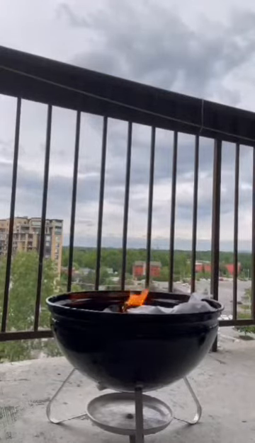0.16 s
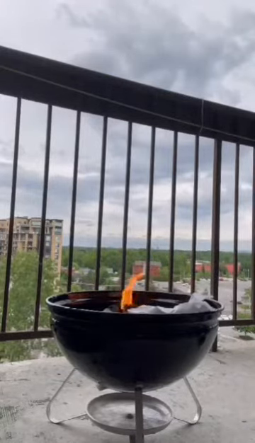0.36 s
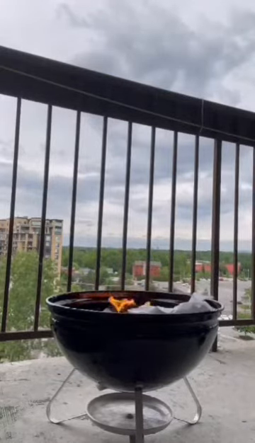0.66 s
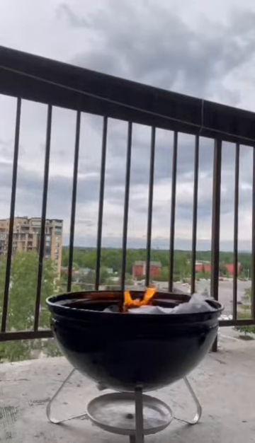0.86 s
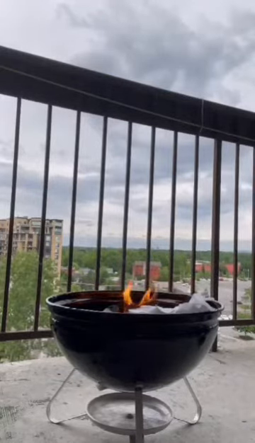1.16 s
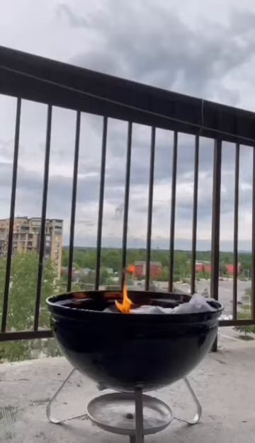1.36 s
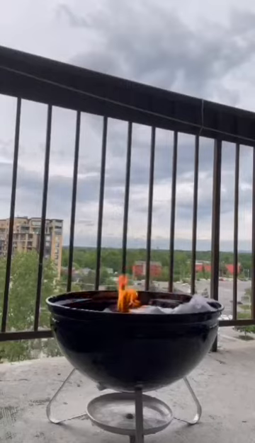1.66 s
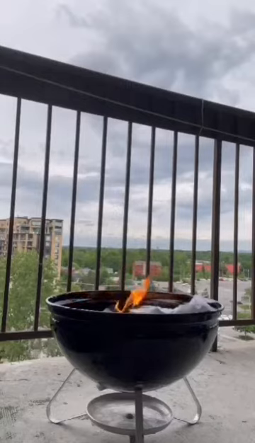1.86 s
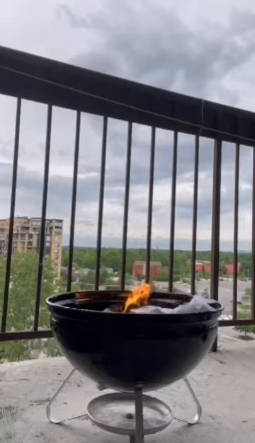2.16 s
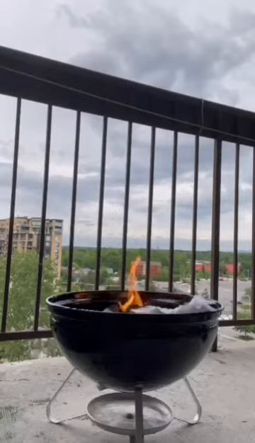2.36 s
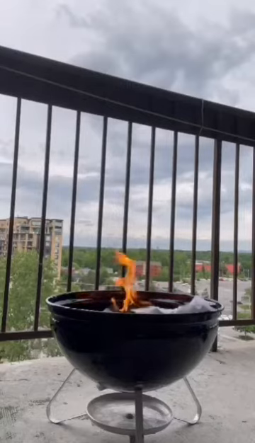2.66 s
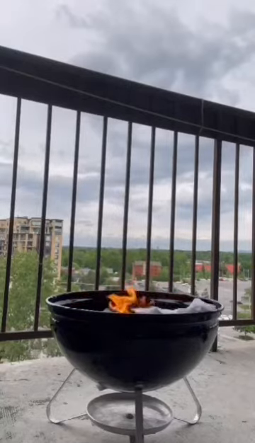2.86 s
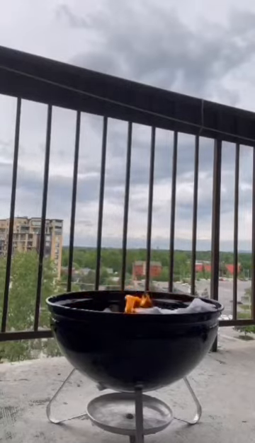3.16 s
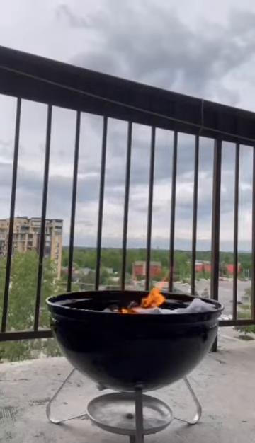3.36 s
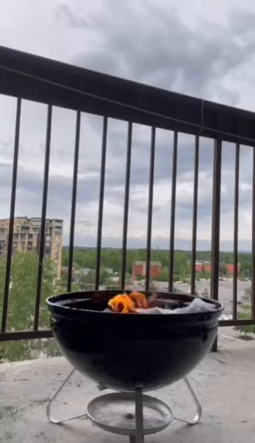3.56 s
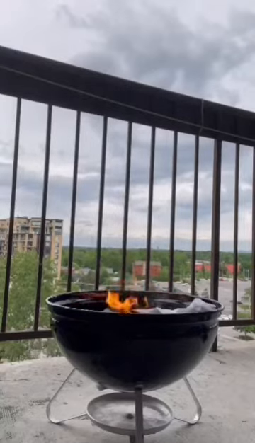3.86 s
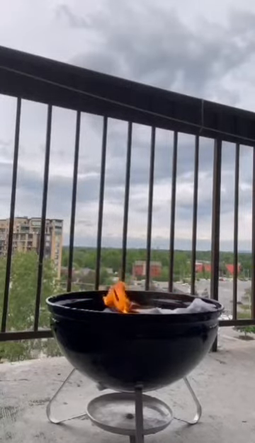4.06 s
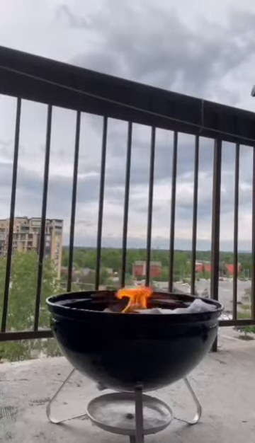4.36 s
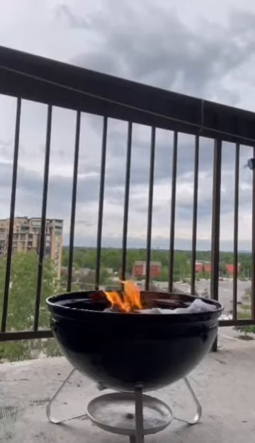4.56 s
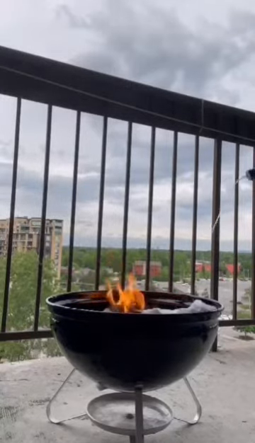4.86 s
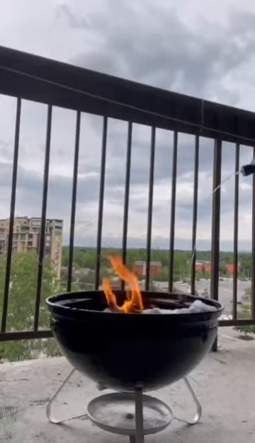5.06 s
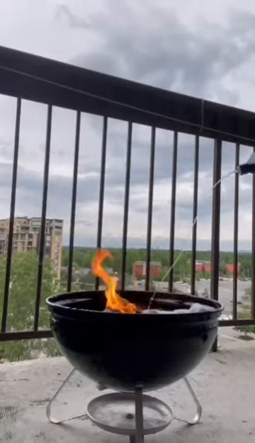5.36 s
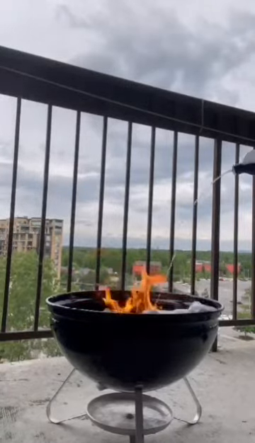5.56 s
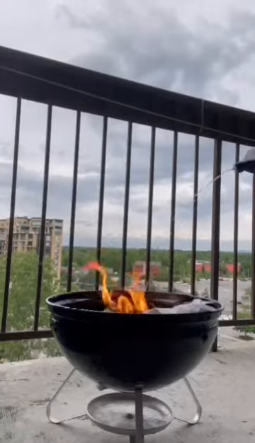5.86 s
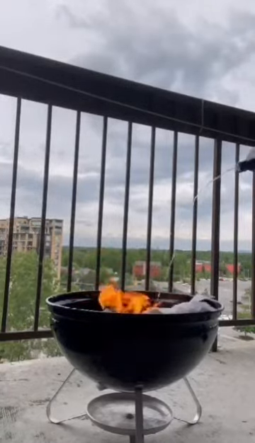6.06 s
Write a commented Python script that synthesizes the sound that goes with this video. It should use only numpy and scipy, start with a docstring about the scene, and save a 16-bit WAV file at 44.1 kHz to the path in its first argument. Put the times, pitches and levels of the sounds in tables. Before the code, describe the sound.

Close stereo pickup of paper and charcoal burning in a small steel grill. A sharp double crack comes first, then a brief vapour spit, scattered woody pops in little clusters, crisp fizzing swells and needle-like ticks. Short echoes come off floor, railing and walls. Beneath, constant soft wind rumble, a low motor hum that swells and wavers, and a distant town wash.

```python
"""First a low rumble of wind, a wavering machine hum and the far wash of the town, up on a high balcony.
Then, close to a pair of microphone ports, paper and charcoal burn in a small steel kettle grill.
Cracks are uneven bursts of noise ringing lump and bowl; sparks tick, and a fine grainy treble swells.
Once a pocket of vapour spits: hissing noise that also blows a resonant cavity.
Random echoes stand for floor, railing, slab and wall; wind and town are coloured noise, the hum is sines."""
import sys
import numpy as np
from scipy import signal
from scipy.fft import rfft, irfft, next_fast_len
from scipy.io import wavfile
from scipy.ndimage import uniform_filter1d, map_coordinates

SR = 44100
rng = np.random.default_rng(int(sys.argv[2]) if len(sys.argv) > 2 else 0)


def output_pcm(signal):
    """Save a mono or channel-first signal as 16-bit PCM at the path in sys.argv[1].

    Samples are clipped to [-1, 1] before scaling.
    """
    pcm = np.clip(np.atleast_2d(signal).T, -1, 1) * 32767
    wavfile.write(sys.argv[1], SR, np.round(pcm).astype(np.int16))


N = 273243
TIME = np.arange(N) / SR  # s

# Far wind, level before a common trim: [t/s, level/dB]
WIND_LEVEL = [(0, -37.5), (.55, -38), (1.4, -39), (2.1, -38.5), (3.0, -38.5), (4.4, -39.5), (6.2, -39)]
# Relative spectra of wind, town, cracking fuel and vapour jet: [f/Hz, level/dB]
WIND_SPECTRUM = [(20, -17), (30, -15.5), (45, -5.5), (60, 3), (78, 1.5), (95, -2.5), (112, -2), (140, -5.5),
                 (170, -10.5), (215, -9), (255, -12.5), (310, -29.5), (400, -35), (600, -90)]
TOWN_SPECTRUM = [(150, -5), (295, 4), (335, 0), (385, -6), (430, 3), (540, 1), (700, -4.5), (930, 0.5),
                 (1150, -4.5), (1500, -10.5), (2200, -16), (3200, -21), (5200, -28.5), (7000, -28.5),
                 (12000, -65.5)]
CRACK_SPECTRUM = [(300, -26.5), (700, -9), (1400, 10.5), (2250, 8), (2700, 6), (3100, 3.5), (4000, 5.5),
                  (5400, 0), (7000, -1), (10500, -3.5), (12500, -13.5)]
HISS_SPECTRUM = [(300, -8), (550, 7), (1200, 3.5), (2000, 13), (2600, 0), (3100, 5), (4200, 5), (5500, 2.5),
                 (6800, 2.5), (8200, -5), (9300, -12), (11300, -2), (12500, -49)]
# Likeness of the two ports for far air and near fire, clipped when read: [f/Hz, correlation/1]
AIR_LIKENESS = [(60, 5.3), (120, 4), (170, 1.6), (250, 0), (350, -0.78), (500, 0.4), (710, 0.19),
                (1010, 0.66), (1430, 0.44), (2200, 0.13), (4100, 0.2), (6000, 0.1), (8300, -0.7),
                (11500, -14)]
FIRE_LIKENESS = [(500, 0.73), (1100, 0.79), (2200, 0.58), (3400, 0.43), (4300, .4), (6000, 0.36), (9000, 1),
                 (11500, 0.54)]
# Tilt of the stereo noise, left over right: [f/Hz, level/dB]
PORT_BALANCE = [(60, 0.5), (100, -0.5), (160, 5), (250, 4), (410, -8), (660, -3), (1070, -4.5), (1740, -3),
                (2800, -2), (4500, 0), (7300, 1), (12000, -1.5)]
# Fundamental of the machine hum, before a common trim: [t/s, level/dB]
HUM_LEVEL = [(0, -36.5), (.55, -34), (.88, -34.5), (1.05, -40), (1.35, -37.5), (1.75, -32.5), (2.05, -31.5),
             (2.3, -35.5), (2.7, -39), (3.2, -34), (3.48, -28), (3.97, -40.5), (4.25, -37.5), (4.45, -32),
             (4.95, -30.5), (5.47, -31.5), (5.65, -37), (6.2, -37.5)]
# Swells of the octave above it, before the same trim: [middle t/s, peak level/dB, half length to 1/e t/s]
OCTAVE_SWELLS = [(.65, -41, 0.12), (1.233, -40, 0.12), (2.143, -39, 0.29), (2.934, -35.5, 0.29),
                 (3.577, -35.5, 0.2), (4.218, -35, 0.27), (5.124, -37.5, 0.3), (5.945, -44.5, 0.44)]
# Swells of fine grainy treble noise: [start t/s, level/dB, hold t/s]
GRAIN_SWELLS = [(.86, -61.5, 0.97), (1.933, -49.5, 0.014), (2.452, -50.5, 0.047), (2.697, -57, 0.17),
                (3.104, -43, 0.017), (3.251, -52, .025), (3.329, -47.5, 0.043), (3.84, -50, .015),
                (5.925, -59, 0.057)]
# Sparks bursting, level before a common trim, fizz against snap:
# [t/s, level/dB, pitch f/Hz, width f/Hz, fizz level/dB, fizz decay to 1/e t/s]
SPARKS = [(2.6775, -39, 10400, 2300, -2, .003), (3.338, -23, 8600, 2600, -14, .002),
          (3.3601, -21.5, 8040, 2300, -5, 0.0014), (4.4674, -38.5, 6140, 900, 4, .004),
          (4.6181, -35, 5500, 2300, -1, 0.011), (4.792, -44.5, 10400, 2300, 0, .004),
          (4.8504, -35.5, 10900, 2020, -3, 0.0034), (5.156, -45, 5070, 2290, -5, 0.0025),
          (5.248, -52.5, 10700, 1500, 8, .004)]
# Gouts in the vapour jet: [t/s, surge of hiss level/dB, surge into cavity level/dB]
GOUTS = [(1.657, 2, 4.5), (1.676, 6, -3), (1.694, -2, 3), (1.701, 1, 2), (1.711, 4.5, 2), (1.724, 0, 6.5)]
# Resonances of the cavity behind the jet: [f/Hz, width f/Hz, relative level/dB]
CAVITY_MODES = [(944, 75, 10.5), (1153, 60, 22), (1290, 81, 17), (1820, 170, 6), (2870, 130, 3)]
# Resonances of the hollow bowl: [f/Hz, width f/Hz, relative level/dB]
BOWL_MODES = [(1010, 380, -3.5), (1350, 370, -2), (1790, 420, 0), (2280, 250, 4), (2990, 270, 1),
              (3550, 180, -3), (4650, 340, -14)]
# Cracks of fuel, with some weak later bursts that act as their reflections;
# before common ring and crack trims; lump against bowl, echo send against direct:
# [t/s, level/dB, lump f/Hz, lump level/dB, direct crack level/dB, length to 1/e t/s,
#  left over right level/dB, echo send level/dB]
POPS = [(1.402, -38.5, 2960, -7, -21, .009, 1, 4), (1.4645, -17.5, 3300, 2, -16.5, 0.0011, 0, -9),
        (1.4668, -17, 2210, 3, -18, 0.00086, 4, -1), (1.474, -37, 1700, -2, -4, .003, 3, 1),
        (1.4838, -16.5, 3000, 1, -14, 0.0021, -1.5, -5), (1.4865, -24, 1970, 8, -21, 0.0024, 5, -1),
        (1.4915, -36.5, 3000, -2, -8, 0.0065, -1, 2), (1.4983, -38, 3000, -4, -8, .0018, 4, -2),
        (1.9342, -30, 1890, -2, -13.5, 0.0027, -3.5, -5), (1.9375, -36, 3090, -5, -19, .0023, 4, 3),
        (1.9675, -41, 3000, -7, -16, 0.0062, 3, 0), (2.1727, -37, 1580, 0, -12, .004, 0, 0.5),
        (2.4528, -33, 3090, 3, -13, 0.0031, 1, -1), (2.4565, -34.5, 1400, 7, -12, 0.0038, 0, 0),
        (2.4847, -37, 3370, 7, -6.5, .003, 2, -2), (2.677, -30, 1310, 4, -14, 0.0041, 0.5, 1),
        (2.7285, -44.5, 3400, 4, -12, .0035, 4, 1), (2.7725, -35.5, 3260, -3, -18, 0.0037, 3, -2),
        (2.8578, -30, 3230, -7, -14.5, 0.0012, 2, -4), (2.8595, -38, 1450, 7, -15, 0.0024, 2, 1),
        (3.0618, -37, 3250, -5, -22, .0021, 11, 2), (3.0665, -34.5, 3210, -2, -15, 0.0022, -2, -3),
        (3.0915, -41, 3400, 3, -14, .0025, 10, 2), (3.1098, -25.5, 3070, 7, -13, .0036, 0, 2),
        (3.1128, -27.5, 2020, 3, -13, 0.0022, 0, -1.5), (3.1165, -34, 3070, -2, -10, 0.0016, -3, 0),
        (3.1212, -31.5, 2180, 6, -12, 0.0035, -1, -3), (3.1255, -38, 2200, 3, -10, 0.0026, 3, -2),
        (3.2535, -34, 3400, -4, -20, 0.0039, 1, 2.5), (3.2655, -43, 3530, 4, -17, .003, 0, 0),
        (3.3005, -41, 3300, 2, -9, 0.0032, 3, 0), (3.664, -36.5, 3310, -5, -34, 0.0032, 1, 0),
        (3.8359, -31, 2980, -1, -15, 0.0042, 2, 0), (3.8479, -28, 3010, 1, -13.5, 0.0039, 10, -1),
        (3.8524, -28.5, 2278, 5, -27, 0.0054, -19, -2), (3.8558, -29, 2280, 21, -19, 0.0041, -3, -4),
        (4.525, -50.5, 3630, 6, -22, 0.0022, 0, 0)]

# How much later the right port hears direct sound and ring (negative: earlier)
DIRECT_LAG_S, RING_LAG_S = .00016, -.00025
HUM_HZ, THIRD_HARMONIC_DB = 61.02, -50.5
DRONE_HZ, DRONE_DB = 359, -60
TOWN_DB, TOWN_SWAY_DB = -45.5, 1.1
SWELL_RISE_S, SWELL_FALL_S, GRAIN_REST_DB = 0.017, 0.025, -67.5
SNAP_S, FIZZ_GRAIN_DB = .00035, 3.5
# Steady flow limits of the jet; the sag continues through the shutting
SPIT_START_S, SPIT_END_S, SPIT_DB, SPUTTER_DB = 1.656, 1.73, -32, 1.6
SPIT_OPEN_DB_PER_S, SPIT_SAG_DB_PER_S, SPIT_SHUT_DB_PER_S = 748, 50, 714
CAVITY_PEAK_S, CAVITY_FALL_DB_PER_S, GOUT_HALF_S = 1.692, 170, 0.0026
CRACK_RISE_S, LUMP_WIDTH_HZ, LUMP_RING_S = .0003, 126, 0.0012
# Faint random pops, before the ring and crack trims
FAINT_POPS_PER_S, FAINT_DB, FAINT_SPREAD_DB = 3.6, -52, 4
FAINT_HZ, FAINT_LUMP_DB, FAINT_CRACK_DB, FAINT_LENGTH_S = 1990, -12.5, -23.5, 0.013
CUTOFF_HZ = 11900


def from_db(db):
    """Decibels to amplitude gain."""
    return 10 ** (np.asarray(db) / 20)


def rms_one(x):
    """Scale to unit power."""
    return x / np.sqrt(np.mean(x ** 2) + 1e-20)


def peak_one(x, size=88):
    """Scale so that the loudest window (88 samples: two milliseconds) has unit power."""
    power = uniform_filter1d(np.mean(x ** 2, axis=0), size)
    return x / np.sqrt(power.max() + 1e-20)


def gain_over_time(rows):
    """Amplitude gain that follows a table of moments and decibels."""
    moments, db = np.transpose(rows)
    return from_db(np.interp(TIME, moments, db))


def at_hz(points, hz):
    """Read a table on a log-frequency axis."""
    known_hz, values = np.transpose(points)
    return np.interp(np.log(hz + 1), np.log(known_hz), values)


def pan(db):
    """Left and right gains for a level of left over right."""
    return from_db(np.array([[.5], [-.5]]) * db)


def right_late(x, lag_s):
    """Travel difference: the right port hears the sound later than the left (earlier if negative)."""
    lag = round(lag_s * SR)
    left = np.roll(x[0], max(-lag, 0))
    right = np.roll(x[1], max(lag, 0))
    return np.stack([left, right])


def colour(x, spectrum):
    """Give a signal a smooth spectrum and unit power."""
    hz = np.fft.rfftfreq(x.shape[-1], 1 / SR)
    shaped = rfft(x) * from_db(at_hz(spectrum, hz))
    return rms_one(irfft(shaped, x.shape[-1]))


def at_ports(pair, likeness):
    """Mix two unrelated signals into the ports, with a likeness and balance for each pitch."""
    size = next_fast_len(pair.shape[-1])
    hz = np.fft.rfftfreq(size, 1 / SR)
    alike = np.clip(at_hz(likeness, hz), -.995, .995)
    mid, side = rfft(pair, size)
    both = np.sqrt(1 + alike) * mid + np.sqrt(1 - alike) * side * [[1], [-1]]
    return irfft(both * pan(at_hz(PORT_BALANCE, hz)), size)


def noise(spectrum, likeness, size=N):
    """Coloured stereo noise, scaled to unit power."""
    white = rng.standard_normal((2, size))
    return colour(at_ports(white, likeness), spectrum)[:, :size]


def drift(per_s):
    """Smooth random wandering of unit power, through so many new values a second."""
    knots = rng.standard_normal(2048)
    return rms_one(map_coordinates(knots, [TIME * per_s], order=3, mode="wrap"))


def jerky(db, length, size):
    """Random gain that jumps about by so many decibels within `size` samples."""
    return from_db(db * rms_one(uniform_filter1d(rng.standard_normal(length), size)))


def resonate(x, modes):
    """Parallel two-pole resonances with alternating signs."""
    out = 0
    for k, (hz, width_hz, db) in enumerate(modes):
        radius = np.exp(-np.pi * width_hz / SR)
        poles = [1, -2 * radius * np.cos(2 * np.pi * hz / SR), radius ** 2]
        ring = (1 - radius ** 2) / 2 * signal.lfilter([1, 0, -1], poles, x)
        out = out + (-1) ** k * from_db(db) * ring
    return out


def add(out, s, burst):
    """Lay a burst into the mix at its moment."""
    start = int(s * SR)
    out[:, start:start + burst.shape[1]] += burst[:, :N - start]


def wind(level_db):
    """Far low rumble: coloured noise with a slowly changing level."""
    return from_db(level_db) * gain_over_time(WIND_LEVEL) * noise(WIND_SPECTRUM, AIR_LIKENESS)


def town(sways_per_s):
    """Far wash of the town below: coloured noise whose level sways at random."""
    level_db = TOWN_DB + TOWN_SWAY_DB * drift(sways_per_s)
    return from_db(level_db) * noise(TOWN_SPECTRUM, AIR_LIKENESS)


def drone(wander_rad):
    """A faint sine with wavering phase stands in the far wash, with its own starting phase at each port."""
    phase = 2 * np.pi * (DRONE_HZ * TIME + rng.random((2, 1))) + wander_rad * drift(per_s=16)
    return from_db(DRONE_DB) * np.sqrt(2) * np.sin(phase)


def hum(level_db, flutter_db, flutter_per_s, wander_rad, right_lead_s):
    """A motor turns steadily: three harmonics flutter and waver, and the octave swells slowly."""
    octave = 0
    for s, db, half_s in OCTAVE_SWELLS:
        octave = octave + from_db(db) * np.exp(-((TIME - s) / half_s) ** 2)
    harmonics = [(1, gain_over_time(HUM_LEVEL)), (2, octave), (3, from_db(THIRD_HARMONIC_DB))]
    out, t = 0, TIME + np.array([[0], [right_lead_s]])
    for multiple, gain in harmonics:
        phase = 2 * np.pi * (multiple * HUM_HZ * t + rng.random()) + wander_rad * drift(per_s=4.01)
        flutter = from_db(flutter_db * drift(flutter_per_s))
        out = out + gain * flutter * np.sqrt(2) * np.sin(phase)
    return from_db(level_db) * out


def balcony(x, early_db, late_db, late_t60_s, gap_s, size=16384):
    """Sparse quick reflections from floor and railing, then a weak dense tail between slab and wall."""
    t = TIME[:size]
    white = rng.standard_normal((2, 2, size)) * (t > gap_s)
    struck = rng.random((2, size)) < 1800 / SR  # reflections per second
    early = white[0] * struck * from_db(-60 * t / .065)  # falls 60 dB in 65 ms
    late = white[1] * from_db(-60 * t / late_t60_s)
    echoes = from_db(early_db) * rms_one(early) + from_db(late_db) * rms_one(late)
    return signal.fftconvolve(x, echoes / np.sqrt(size), axes=1)[:, :N]


def grainy_treble(per_s):
    """Swells of fine grainy treble noise, made of dense uneven snaps: rise, hold and fall to a faint rustle."""
    swelling = from_db(GRAIN_REST_DB)
    for s, db, hold_s in GRAIN_SWELLS:
        before = np.maximum(s - TIME, 0) / SWELL_RISE_S
        after = np.maximum(TIME - s - hold_s, 0) / SWELL_FALL_S
        swell = from_db(db) * np.exp(-np.minimum(before + after, 20))
        swelling = np.maximum(swelling, swell)
    size_db = 2.5 * np.minimum(rng.exponential(1, (2, N)), 4)
    sizes = from_db(size_db) * rng.choice([-1, 1], (2, N))
    snaps = sizes * (rng.random((2, N)) < per_s / SR)
    grains = colour(at_ports(snaps, FIRE_LIKENESS), CRACK_SPECTRUM)[:, :N]
    return swelling * right_late(grains, DIRECT_LAG_S)


def sparks(crack_db, level_db, size=2048):
    """Tiny grains burst with one needle-sharp snap and fizz out, through a resonance at their own pitch."""
    out, t = np.zeros((2, N)), TIME[:size]
    for s, db, hz, width_hz, fizz_db, fizz_s in SPARKS:
        snap = peak_one(noise(CRACK_SPECTRUM, FIRE_LIKENESS, size) * np.exp(-(t / SNAP_S) ** 2))
        grain = jerky(FIZZ_GRAIN_DB, size, size=16)
        fizz = peak_one(noise(CRACK_SPECTRUM, FIRE_LIKENESS, size) * grain * np.exp(-t / fizz_s))
        crack = snap + from_db(fizz_db) * fizz
        tick = resonate(crack, [(hz, width_hz, 0)]) + from_db(crack_db) * crack
        add(out, s, from_db(db + level_db) * peak_one(right_late(tick, DIRECT_LAG_S)))
    return out


def across_bowl(x, lag_s, kept):
    """Sound bouncing from wall to wall in the bowl leaves evenly spaced spectral peaks."""
    hz = np.fft.rfftfreq(x.shape[-1], 1 / SR)
    loop = kept * np.exp(-2j * np.pi * hz * lag_s)
    return irfft(rfft(x) / (1 - loop), x.shape[-1])


def spit(cavity_db):
    """A short vapour jet opens, weakens as its pocket empties and shuts; gouts surge and blow the cavity."""
    opening = SPIT_OPEN_DB_PER_S * np.maximum(SPIT_START_S - TIME, 0)
    sagging = SPIT_SAG_DB_PER_S * np.maximum(TIME - SPIT_START_S, 0)
    shutting = SPIT_SHUT_DB_PER_S * np.maximum(TIME - SPIT_END_S, 0)
    flow = from_db(np.maximum(SPIT_DB - opening - sagging - shutting, -200))
    surge_db, blow_db = 0, 0
    for s, hiss_surge_db, cavity_surge_db in GOUTS:
        gout = np.exp(-((TIME - s) / GOUT_HALF_S) ** 2)
        surge_db = surge_db + hiss_surge_db * gout
        blow_db = blow_db + cavity_surge_db * gout
    sputter = jerky(SPUTTER_DB, N, size=60)
    jet = right_late(noise(HISS_SPECTRUM, FIRE_LIKENESS) * sputter, DIRECT_LAG_S)
    hiss = flow * from_db(surge_db) * rms_one(across_bowl(jet, lag_s=.001, kept=.25))
    # the cavity is driven hardest in mid-flow
    blowing = flow * from_db(blow_db - CAVITY_FALL_DB_PER_S * np.abs(TIME - CAVITY_PEAK_S))
    cavity = peak_one(resonate(blowing * jet + 1e-18, CAVITY_MODES), size=900)
    return hiss + from_db(cavity_db) * cavity


def fracture(length_s, size=2048):
    """Force of a crack: it opens almost at once, runs briefly in uneven jerks and stops."""
    t = TIME[:size]
    run = (1 - np.exp(-t / CRACK_RISE_S)) * np.exp(-(t / length_s) ** 2)
    return run * jerky(3, size, size=14)


def lump(force, hz):
    """The cracking lump rings at its own unsteady pitch while the force lasts, then dies quickly."""
    swing = signal.lfilter([1], [1, -np.exp(-1 / (LUMP_RING_S * SR))], force)
    wobble = np.cumsum(rng.standard_normal(len(force))) * np.sqrt(2 * np.pi * LUMP_WIDTH_HZ / SR)
    ring = swing * np.sin(2 * np.pi * hz * TIME[:len(force)] + wobble)
    return peak_one(ring * np.ones((2, 1)))  # the same at both ports


def faint_pops(count=64):
    """Faint pops at random moments, as rows with the columns of POPS."""
    rows = []
    for s in np.cumsum(rng.exponential(1 / FAINT_POPS_PER_S, count)):
        db, octaves, pan_db = rng.standard_normal(3) * [FAINT_SPREAD_DB, .15, 2]
        if s < TIME[-1]:
            rows.append((s, FAINT_DB + db, FAINT_HZ * 2 ** octaves, FAINT_LUMP_DB,
                         FAINT_CRACK_DB, FAINT_LENGTH_S, pan_db, 0))
    return rows


def pops(rows, ring_db, crack_db):
    """Each burst is heard directly and rings a lump and the bowl; a share is sent to the walls."""
    out, sent = np.zeros((2, 2, N))
    for s, db, hz, lump_db, direct_db, length_s, pan_db, echo_db in rows:
        force = fracture(length_s)
        crack = force * noise(CRACK_SPECTRUM, FIRE_LIKENESS, size=len(force))
        bowl = peak_one(resonate(crack, BOWL_MODES))
        ring = right_late(bowl + from_db(lump_db) * lump(force, hz), RING_LAG_S)
        direct = right_late(across_bowl(crack, lag_s=.00088, kept=.3), DIRECT_LAG_S)
        burst = from_db(ring_db) * peak_one(ring) + from_db(crack_db + direct_db) * peak_one(direct)
        add(out, s, from_db(db) * pan(pan_db) * burst)
        add(sent, s, from_db(db + echo_db) * pan(pan_db) * burst)
    return out, sent


def scene():
    """The near fire on its balcony, over far wind, town and machine hum."""
    far = wind(level_db=3.0) + town(sways_per_s=4.94) + drone(wander_rad=1.0)
    machine = hum(level_db=0.62, flutter_db=0.56, flutter_per_s=14, wander_rad=0.24, right_lead_s=0.00012)
    grain = grainy_treble(per_s=1300)
    ticking = sparks(crack_db=-17.0, level_db=-5.5)
    ticking_echo = balcony(ticking, early_db=-12.0, late_db=-12.0, late_t60_s=.2, gap_s=.003)
    spitting = spit(cavity_db=-28.5)
    spitting_echo = balcony(spitting, early_db=-6.0, late_db=-12.5, late_t60_s=0.25, gap_s=0.0048)
    faint, _ = pops(faint_pops(), ring_db=-5.5, crack_db=4.5)  # no echo of these
    popping, sent = pops(POPS, ring_db=-6.0, crack_db=5.0)
    popping_echo = balcony(sent, early_db=-4.5, late_db=-11.5, late_t60_s=0.22, gap_s=0.0037)
    fire = ticking + ticking_echo + spitting + spitting_echo + faint + popping + popping_echo
    return far + machine + grain + fire


def record(dry):
    """The treble is cut steeply by an elliptic low-pass."""
    lowpass = signal.ellip(12, .1, 80, CUTOFF_HZ, fs=SR, output="sos")
    return signal.sosfilt(lowpass, dry)


dry = scene()
out = record(dry)
output_pcm(out)
```